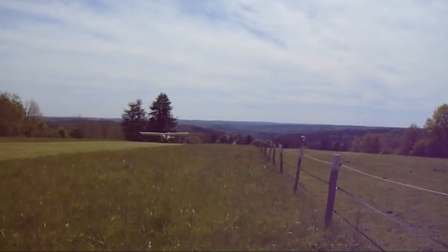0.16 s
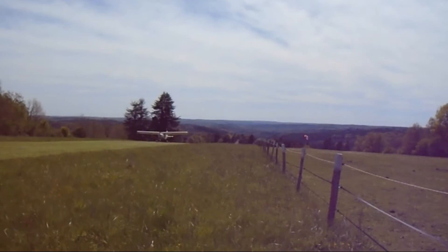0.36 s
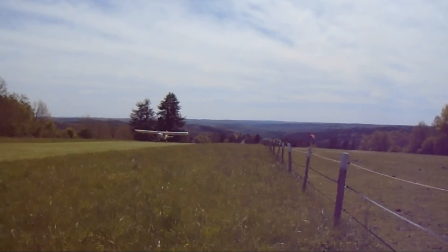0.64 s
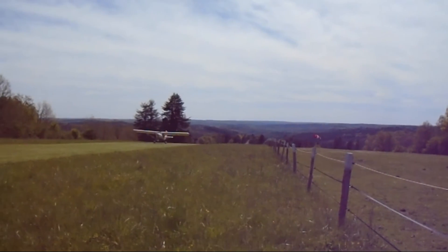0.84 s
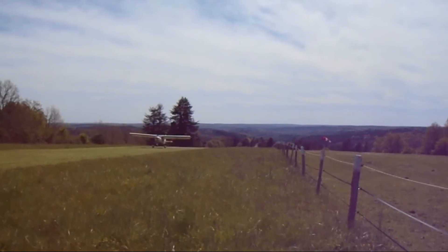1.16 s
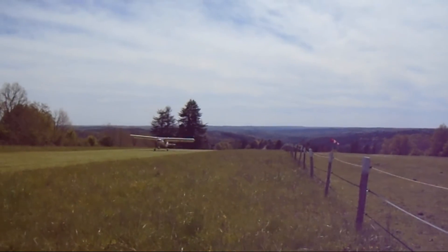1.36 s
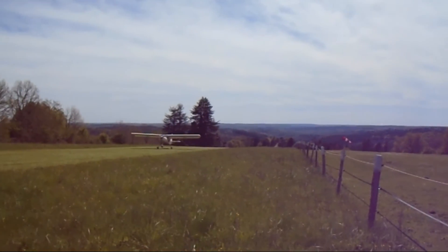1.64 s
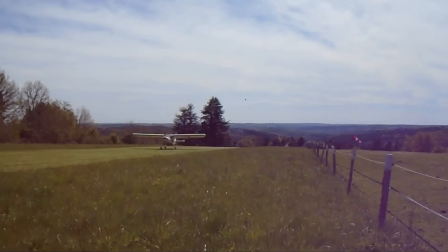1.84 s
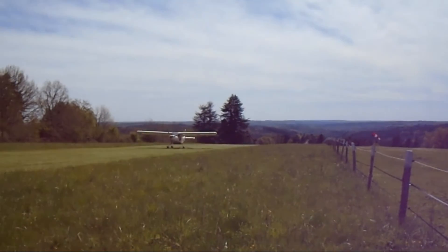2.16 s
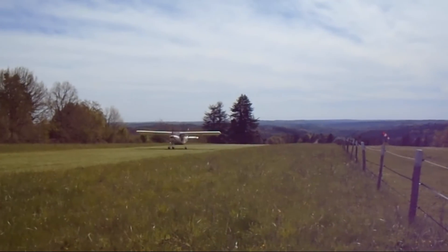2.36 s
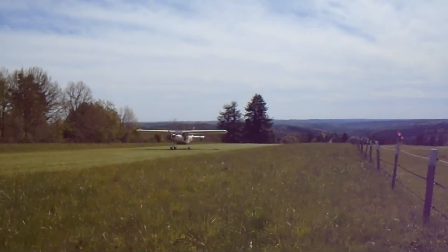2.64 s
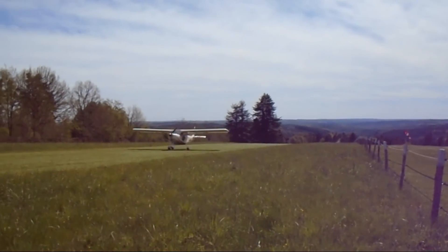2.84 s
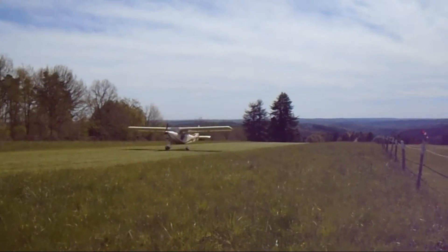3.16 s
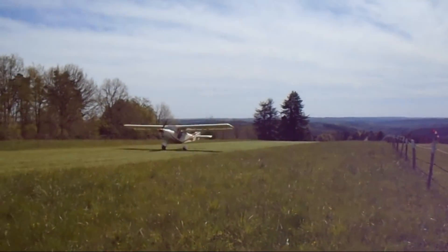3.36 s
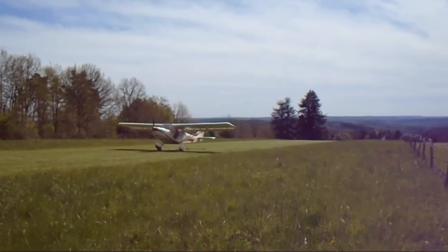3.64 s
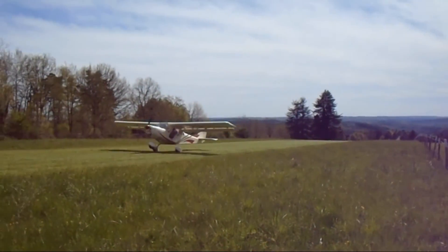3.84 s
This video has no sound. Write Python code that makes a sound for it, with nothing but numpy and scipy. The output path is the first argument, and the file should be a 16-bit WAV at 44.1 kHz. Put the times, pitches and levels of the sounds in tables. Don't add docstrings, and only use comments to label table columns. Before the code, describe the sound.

A small piston aeroplane approaches, its throbbing drone swelling and rising as gusts thump the microphone.

```python
import sys
import numpy as np
from scipy import signal
from scipy.io import wavfile
from scipy.ndimage import uniform_filter1d

SR = 44100
rng = np.random.default_rng(int(sys.argv[2]) if len(sys.argv) > 2 else 0)


def file_out(sig):
    cols = np.atleast_2d(sig).T
    lim = np.clip(cols, -1, 1)
    pcm = np.round(lim * 32767).astype(np.int16)
    wavfile.write(sys.argv[1], SR, pcm)


def gain_from_decibels(decibels):
    exponent = np.asarray(decibels, float) / 20
    return 10 ** exponent


N = 176400


def rms_one(x):
    return x / np.sqrt(np.mean(x ** 2) + 1e-20)


def in_time(rows):
    start_s, *columns = np.transpose(rows)
    return [np.interp(np.arange(N) / SR, start_s, column) for column in columns]


def cut(x, hz, kind, order=2):
    return signal.sosfilt(signal.butter(order, hz, kind, fs=SR, output="sos"), x)


def drift(rate_hz):
    pole = np.exp(-40 * np.pi * rate_hz / SR)
    white = rng.standard_normal(N // 20 + 2002)
    slow = signal.lfilter([1], [1, -2 * pole, pole * pole], white)[2000:]
    return np.interp(np.arange(N) / 20, np.arange(len(slow)), rms_one(slow))


# start_s [s], flutter_db [dB], rumble_db [dB]
WIND_GUSTS = [(0.0, -31.5, -37), (0.18, -55.5, -20.5), (0.39, -28.5, -31.5), (0.46, -21.5, -29.5),
              (0.61, -28, -26), (0.68, -30, -13), (0.78, -39.5, -32.5), (1.01, -47, -21.5),
              (1.09, -45.5, -48), (1.46, -44, -37.5), (1.76, -31, -21.5), (2.0, -34, -34),
              (2.57, -25, -26.5), (3.1, -30.5, -35.5), (3.36, -42, -24), (3.75, -19.5, -26.5),
              (3.91, -24, -27), (4.0, -41.5, -36)]


def wind():
    flutter_db, rumble_db = in_time(WIND_GUSTS)
    white = rng.standard_normal((2, N))
    lumps = np.minimum(drift(20), 1)
    flutter = rms_one(cut(cut(white[0], 77, "high"), 170, "low"))
    flutter = cut(flutter, 540, "low")
    rumble = rms_one(cut(cut(white[1], 31, "high"), 64.8, "low"))
    flutter = gain_from_decibels(flutter_db + 3 + 4 * lumps) * flutter
    return flutter + gain_from_decibels(rumble_db + 0.5 * drift(15)) * rumble


# centre_s [s], level_db [dB], width_s [s], pitch_hz [Hz]
EDDIES = [(.154, -17, 0.01, 160), (.196, -20.5, 0.03, 170), (.295, -24, 0.0099, 148),
          (0.333, -21.5, 0.031, 210), (0.425, -11.5, 0.021, 239), (0.443, -7, 0.0091, 253),
          (0.496, -15.5, 0.01, 297), (.641, -11.5, 0.0082, 371), (0.669, -12, 0.029, 240),
          (0.684, -10.5, 0.0041, 304), (0.708, -17.5, 0.027, 177), (0.83, -23.5, 0.017, 208),
          (0.972, -24, 0.027, 220), (1.044, -16.5, 0.0085, 231), (1.583, -12.5, 0.031, 193),
          (1.737, -14, 0.013, 154), (1.79, -6.5, 0.018, 159), (1.89, -27, 0.054, 270),
          (2.928, -25.5, 0.097, 275), (2.38, -30.5, 0.071, 265), (2.416, -14.5, 0.032, 218),
          (2.555, -9, 0.011, 230), (2.578, -11, 0.015, 328), (2.641, -20.5, 0.028, 238),
          (2.854, -24, 0.048, 223), (3.583, -21, 0.015, 205), (3.622, -29, 0.0076, 270),
          (3.716, -35, 0.03, 202), (3.802, -6.5, 0.043, 292), (3.898, -9.5, 0.032, 281)]


def buffets():
    spike_db, spike_cycles, spike_under_s = 9, 0.23, 0.027
    out = np.zeros(N + 8192)
    t = np.arange(-4096, 4096) / SR
    whites = rng.standard_normal((len(EDDIES), 8192))
    for (centre_s, level_db, width_s, pitch_hz), white in zip(EDDIES, whites):
        swing = cut(white, 0.38 * pitch_hz, "high")
        swing = cut(swing, 0.44 * pitch_hz, "low", order=1)
        swing = rms_one(cut(swing, 1.976 * pitch_hz, "low", order=3))
        swing = swing / np.sqrt(uniform_filter1d(swing ** 2, size=400) + 0.024)
        u = t * pitch_hz / spike_cycles
        spike = (1 - u * u + 0.68 * u) * np.exp(-u * u / 2)
        spike_gain = gain_from_decibels(spike_db) * np.exp(-(width_s / spike_under_s) ** 2)
        swing = swing + np.sign(white[0]) * spike_gain * spike
        envelope = gain_from_decibels(level_db - 7.7 * np.abs(2 * t / width_s) ** 2.1)
        i = int(centre_s * SR)
        out[i:i + 8192] += envelope * swing
    return out[4096:N + 4096]


# start_s [s],
# level_db # [dB], throb_depth [0-1], tilt_db [dB per octave]
AIRCRAFT_HISS = [(0, -60.5, 0.3, -0.5), (.42, -53.5, 0.1, 0.5), (.75, -56, 0.1, 0), (1.0, -48, 0.16, 0.5),
                 (1.37, -52, 0, -3), (1.58, -48.5, .2, -1), (1.9, -44, 0.3, -1.27),
                 (2.54, -40.5, 0.26, -0.54), (2.6, -45, 0.15, 0), (2.78, -40, 0.29, -0.3),
                 (3.2, -37.5, 0.15, 0.4), (3.65, -34, 0.26, 0.6), (3.79, -30, 0, 1.1), (3.88, -34, 0.1, 0),
                 (4.0, -36, .2, -1)]
# band_hz [Hz], level_db [dB per Hz]
HISS_COLOUR = [(300, 4), (1200, 0), (3300, -0.5), (4300, -11.5), (5460, -19.5), (8500, -21), (10500, -65),
               (15800, -52)]
# centre_hz [Hz], width_hz [Hz], level_db [dB]
RESONANCES = [(470, 100, -28), (703, 31, -12), (7910, 1360, -19.5), (14200, 1700, -26)]


def hiss(turn):
    level_db, depth, tilt_db = in_time(AIRCRAFT_HISS)
    colour_hz, colour_db = np.transpose(HISS_COLOUR)
    edges = 200 * 2 ** np.arange(0, 6.4, 1 / 3)
    white = rng.standard_normal((2, N))
    together = drift(8.4)
    air = 0
    for k, (low, high) in enumerate(zip(edges, edges[1:])):
        db = np.interp(np.log(low * high) / 2, np.log(colour_hz), colour_db)
        patches_db = 1.5 * (together + drift(4))
        band = cut(white[k % 2], [low, high], "band", order=3)
        air = air + gain_from_decibels(db + tilt_db * np.log2(low / 1800) + patches_db) * band
    air = rms_one(air)
    for hz, width_hz, db in RESONANCES:
        ring = rms_one(cut(white[0], [hz - width_hz / 2, hz + width_hz / 2], "band"))
        air = air + gain_from_decibels(db + tilt_db * np.log2(hz / 1800)) * ring
    throb = np.exp(depth * (0.62 * np.cos(turn / 2) + 0.74 * np.cos(turn) + 0.3 * drift(60)))
    return gain_from_decibels(level_db + 2.5) * air * throb


# multiple [of tooth-mesh rate], level_db [dB]
GEAR_PARTIALS = [(1, -5), (2, 1.5), (3, 3), (4, 2.5)]


def gears(turn, whine_db):
    ratio, blur_hz, throb = 10.7, 48, 0.6
    whine = 0
    for k, db in GEAR_PARTIALS:
        mesh = k * ratio * turn
        whine = whine + gain_from_decibels(db) * (np.sin(mesh) * drift(blur_hz) + np.cos(mesh) * drift(blur_hz))
    return gain_from_decibels(whine_db) * whine * (1 + throb * np.cos(turn / 2))


# multiple [of firing rate], level_db [dB over the beat]
EXHAUST_ORDERS = [(1, 3.5), (2, -3), (3, -8), (4, -15), (5, -20), (6, -24)]


def exhaust(turn, beat_db):
    beat = 0
    for k, db in EXHAUST_ORDERS:
        shimmer_db = 2.2 * drift(9.6)
        beat = beat + gain_from_decibels(db + shimmer_db) * np.sin(k * turn + k * k)
    return gain_from_decibels(beat_db) * beat


# start_s [s], firing_hz [Hz], beat_db [dB], whine_db [dB]
ENGINE_RUN = [(0, 50, -46, -75), (1.0, 48, -43, -68), (1.35, 46, -44, -70), (1.55, 48.5, -40, -68),
              (1.75, 53.5, -36, -65), (2.1, 57, -34, -62), (2.4, 56, -34, -60), (2.8, 53, -35, -57),
              (3.02, 53.5, -35, -52), (3.3, 59.8, -29, -47), (3.48, 66, -27, -44.5), (3.62, 73, -25, -42.5),
              (3.8, 84.6, -21, -40.5), (3.87, 88, -23, -54), (4.0, 95, -28, -57)]


def aircraft():
    firing_hz, beat_db, whine_db = in_time(ENGINE_RUN)
    turn = 2 * np.pi * np.cumsum(firing_hz) / SR
    return exhaust(turn, beat_db) + gears(turn, whine_db) + hiss(turn)


def scene():
    mid = aircraft() + wind() + buffets()
    side = cut(cut(mid, 680, "high", order=5), 9000, "low", order=1)
    side = gain_from_decibels(-20) * side
    return np.array([mid - side, mid + side])


# band_hz [Hz], threshold_db [dB in a -30 dB moment]
MASKING = [(3000, -110), (4600, -99.5), (6000, -98), (9000, -92), (12000, -83.5), (16000, -92)]


def thin(pair):
    mid_side = np.array([pair[0] + pair[1], pair[0] - pair[1]]) / 2
    hz, _, z = signal.stft(mid_side, SR, "cosine", 2048)
    power = np.abs(z[:, :1024]) ** 2 + 1e-20
    band_power = power.reshape(2, 64, 16, -1).mean(axis=2)
    band_db = 10 * np.log10(band_power).repeat(16, axis=1)
    moment_db = 10 * np.log10(power[0].sum(axis=0))
    moments = len(moment_db)

    floor_db = np.interp(hz[:1024], *np.transpose(MASKING))[:, None] + 0.9 * (moment_db + 30)
    flicker = rng.standard_normal(moments)
    flicker = flicker + rng.standard_normal((64, moments)).repeat(16, axis=0) / 2
    floor_db = floor_db + 3.5 * flicker
    side_chance_db = 5.5 * rng.standard_normal((64, moments)).repeat(16, axis=0)
    side_floor_db = -87 - 1.5 * (moment_db + 22) + side_chance_db

    z[:, :1024] *= np.array([band_db[0] > floor_db, band_db[1] > side_floor_db])
    mid, side = signal.istft(z, SR, "cosine", 2048)[1][:, :N]
    return np.array([mid + side, mid - side])


def band_limit(x):
    return signal.sosfilt(signal.butter(12, 16120, fs=SR, output="sos"), x)


def record(dry):
    rounded = 1.371 * np.tanh(dry / 1.667)
    return band_limit(thin(rounded))


dry = scene()
out = record(dry)
file_out(out)
```